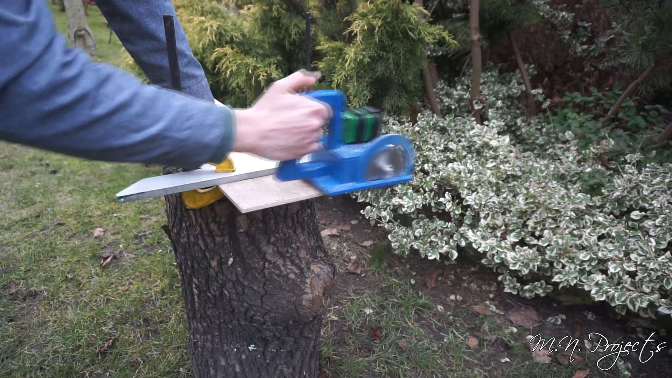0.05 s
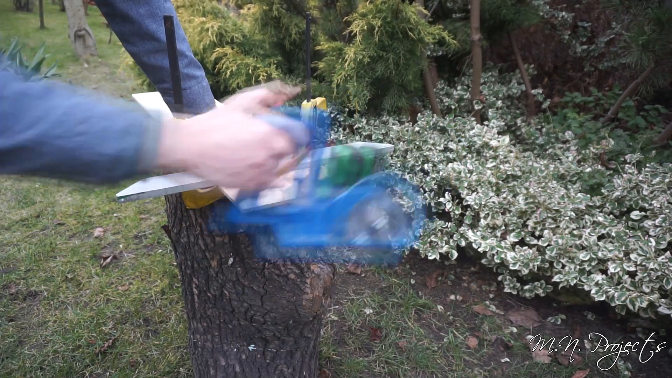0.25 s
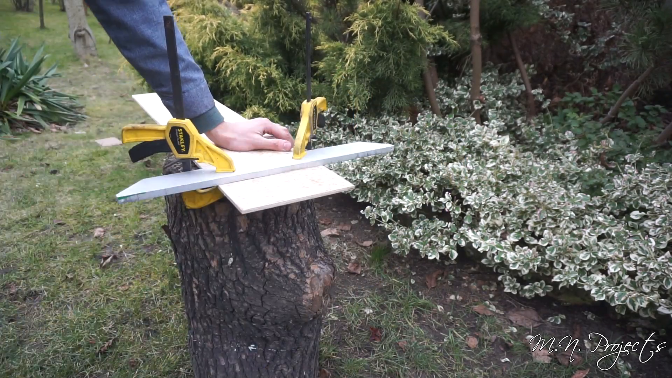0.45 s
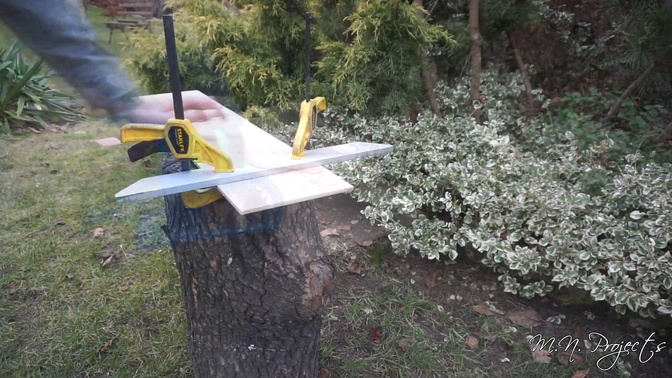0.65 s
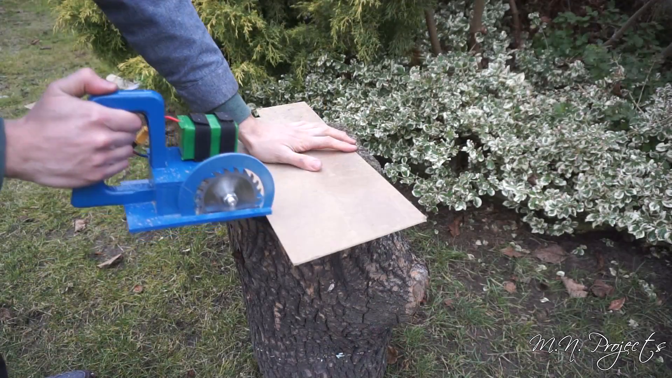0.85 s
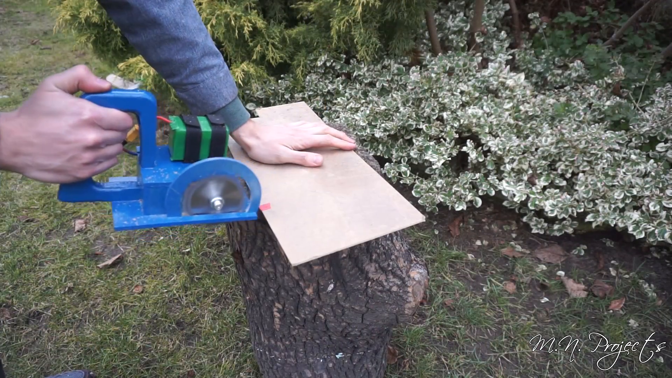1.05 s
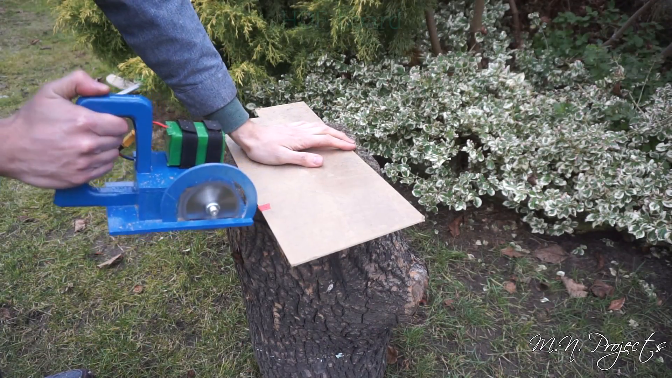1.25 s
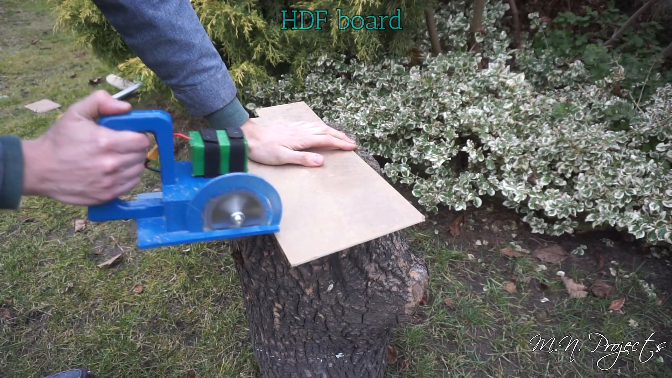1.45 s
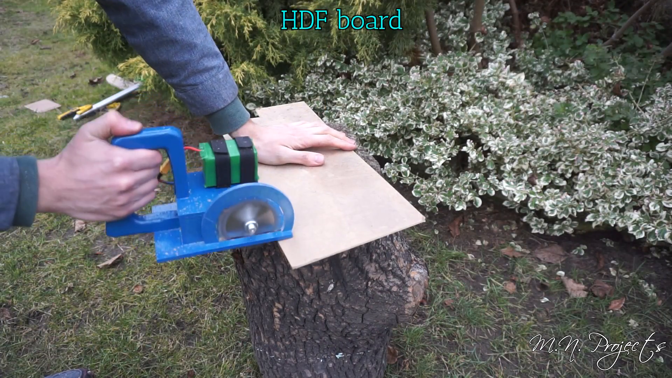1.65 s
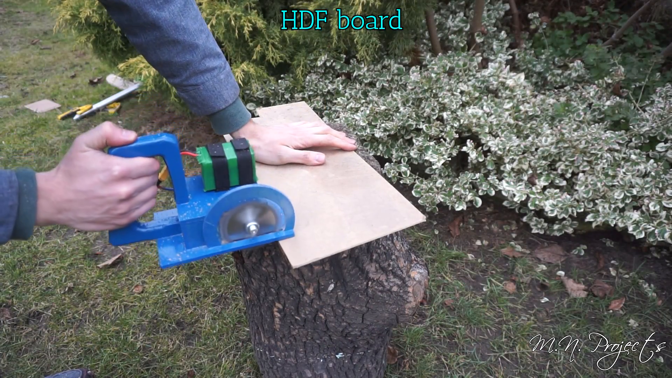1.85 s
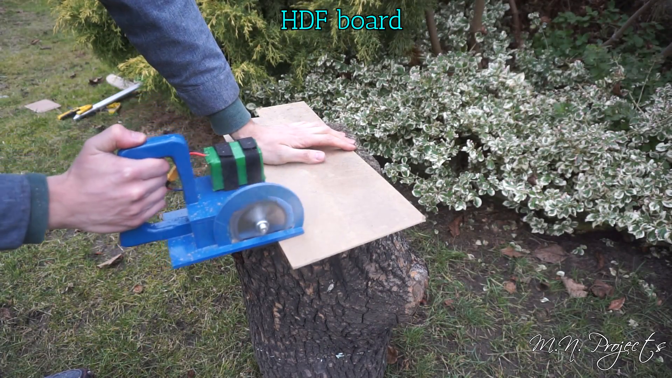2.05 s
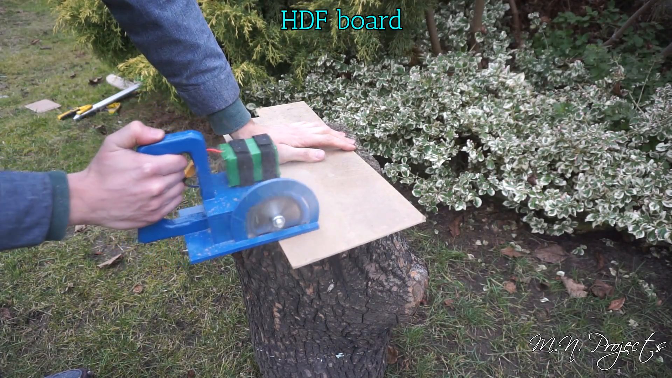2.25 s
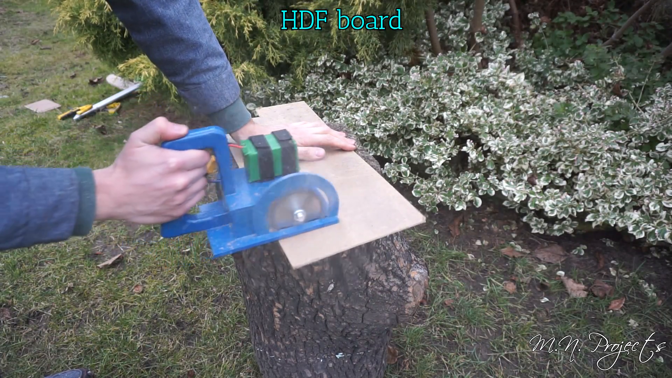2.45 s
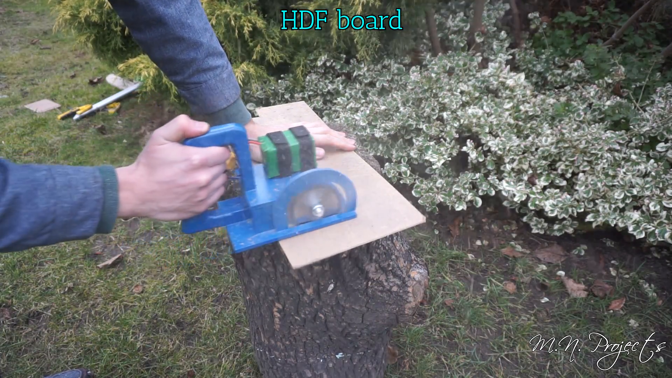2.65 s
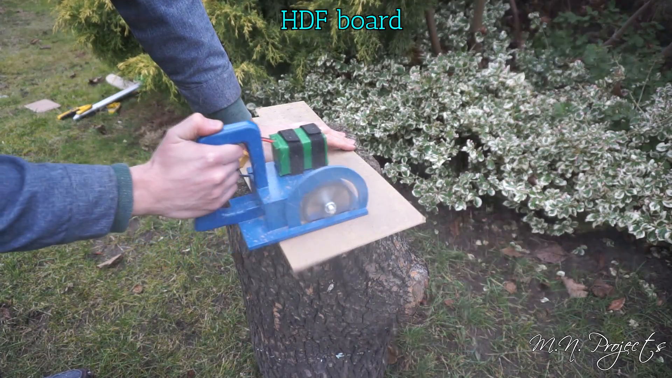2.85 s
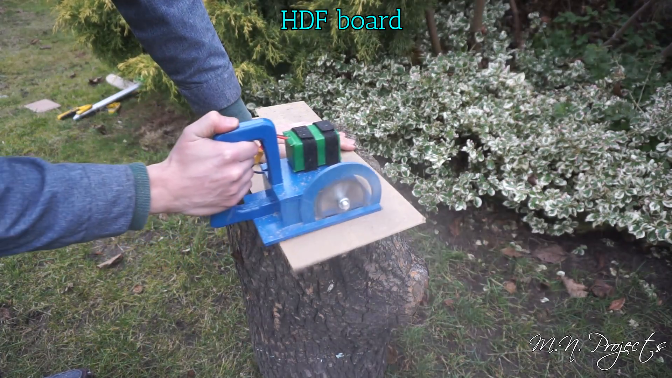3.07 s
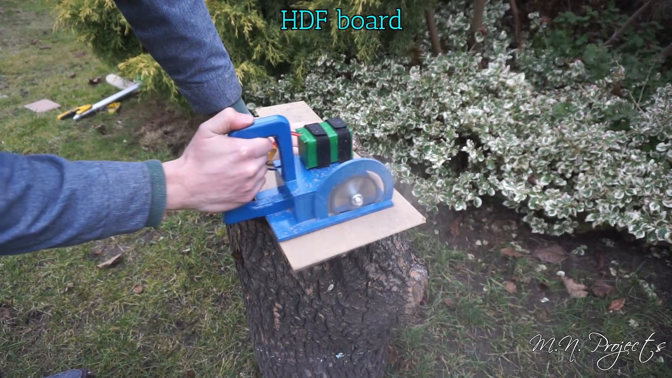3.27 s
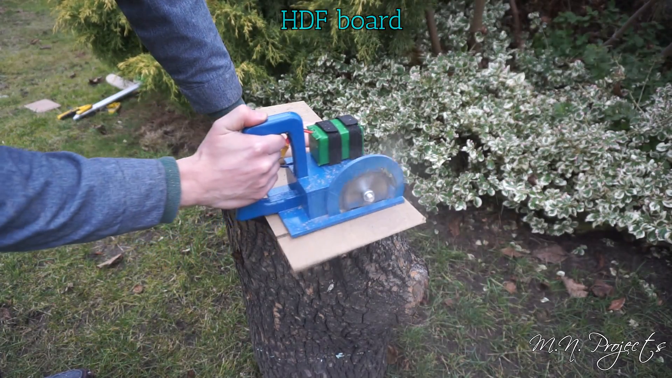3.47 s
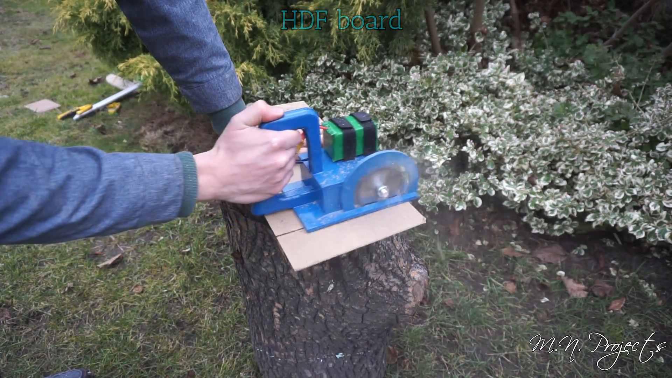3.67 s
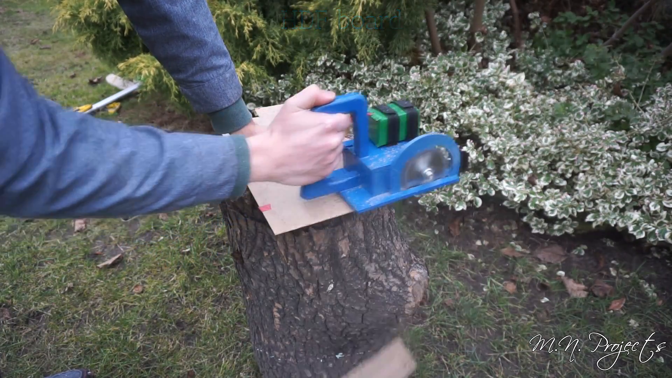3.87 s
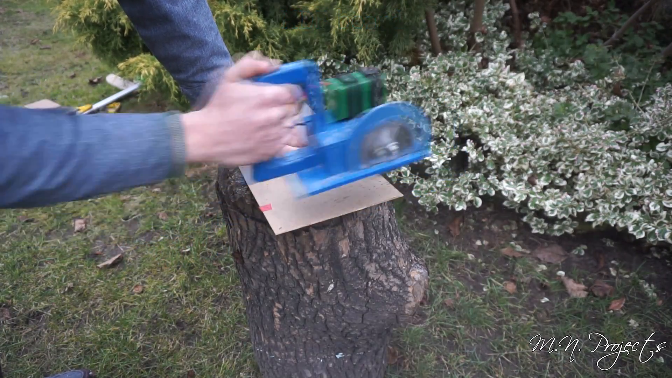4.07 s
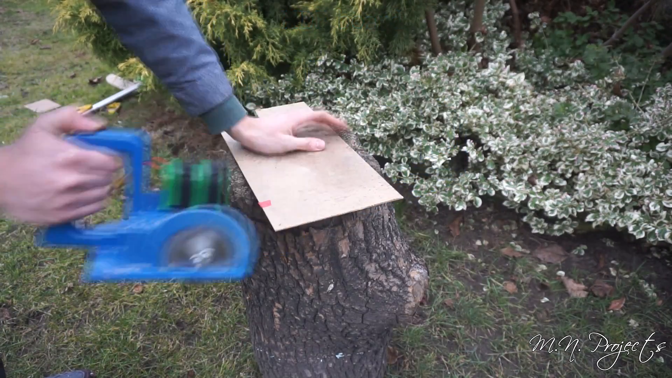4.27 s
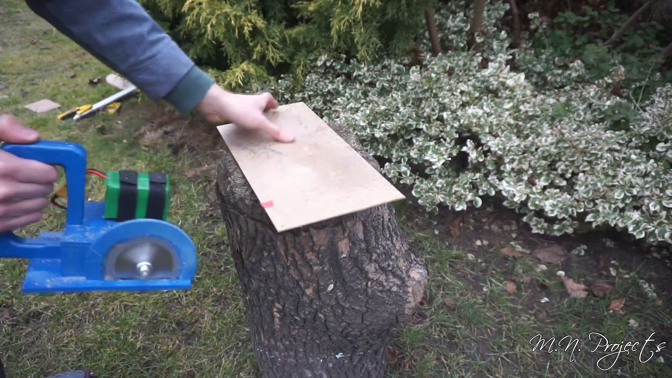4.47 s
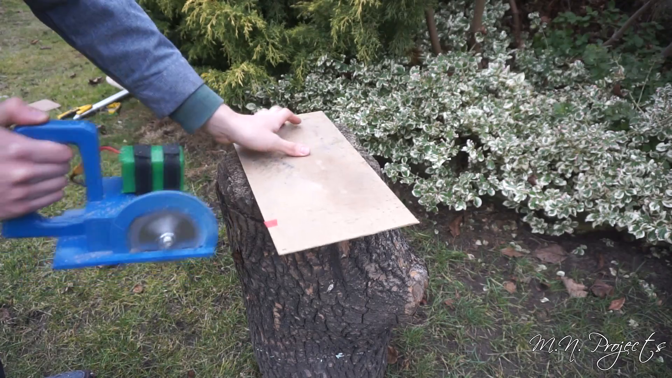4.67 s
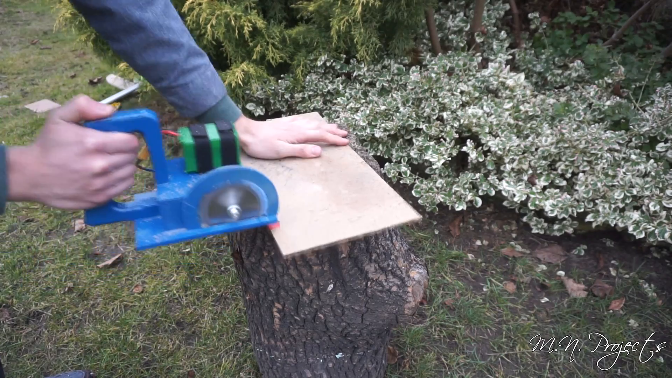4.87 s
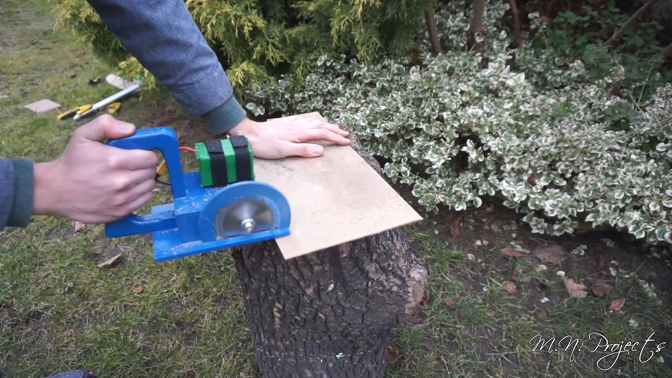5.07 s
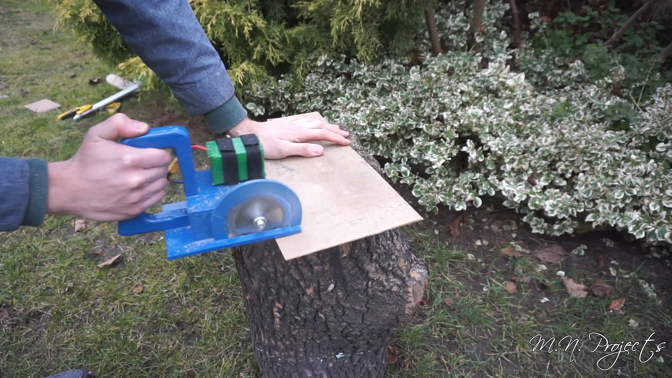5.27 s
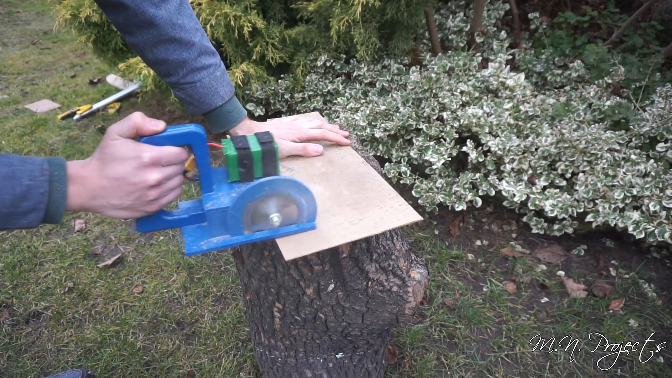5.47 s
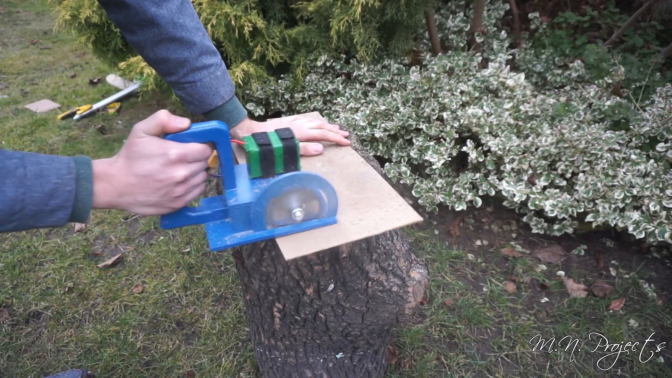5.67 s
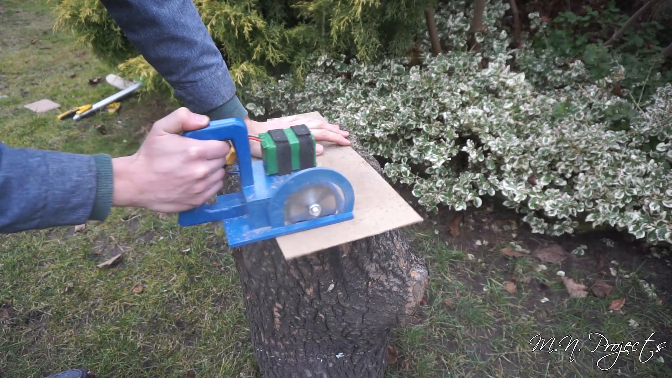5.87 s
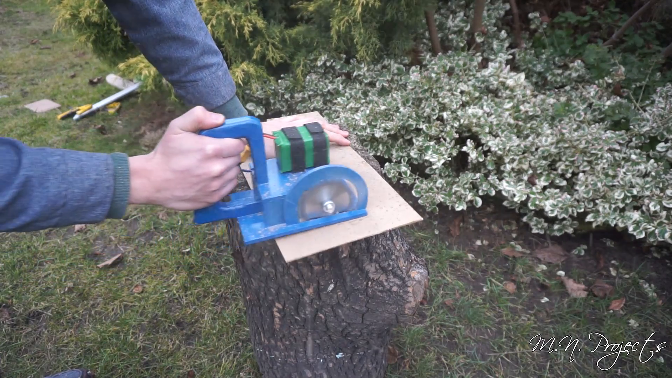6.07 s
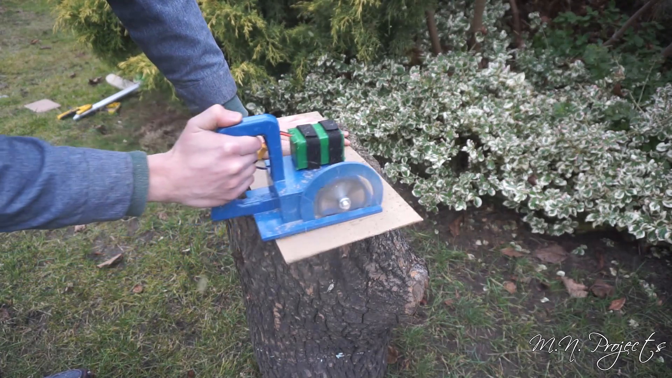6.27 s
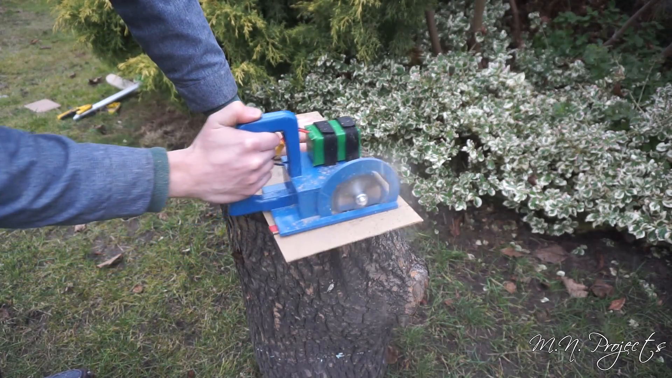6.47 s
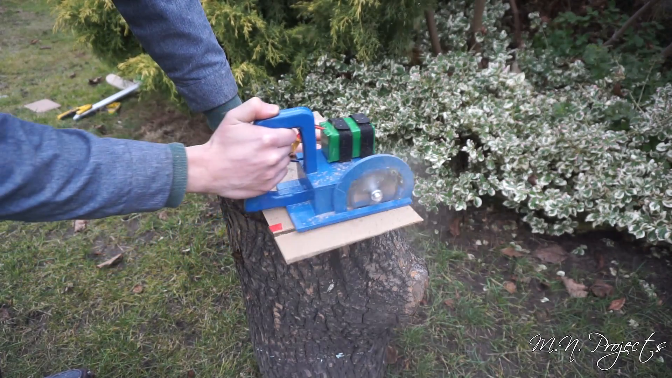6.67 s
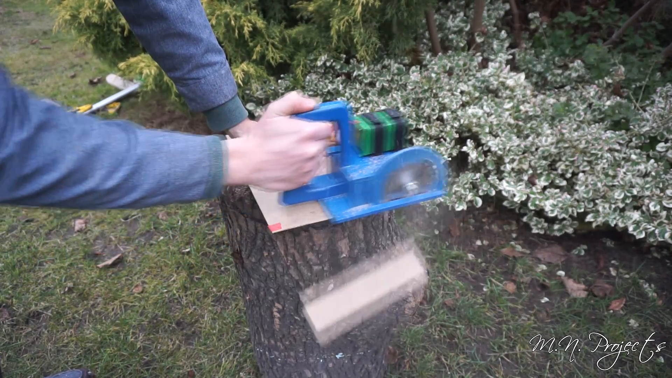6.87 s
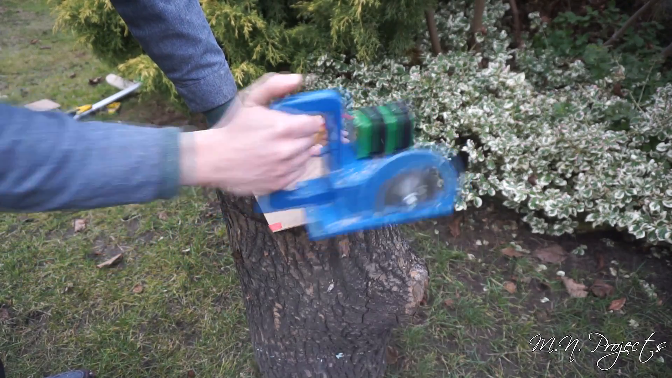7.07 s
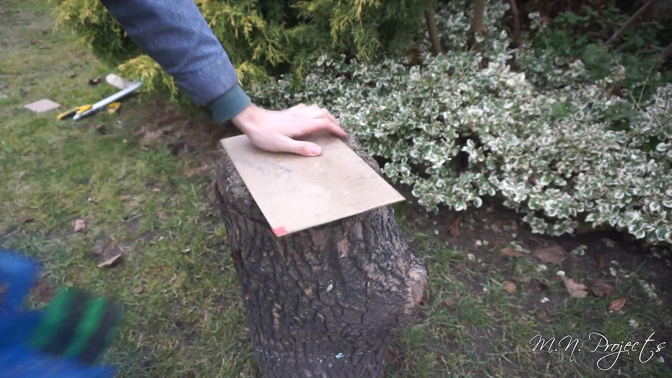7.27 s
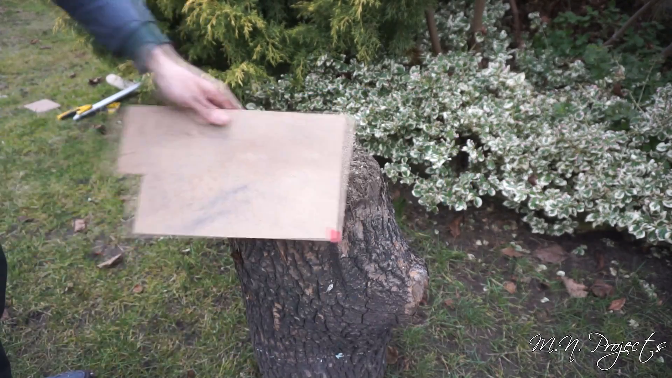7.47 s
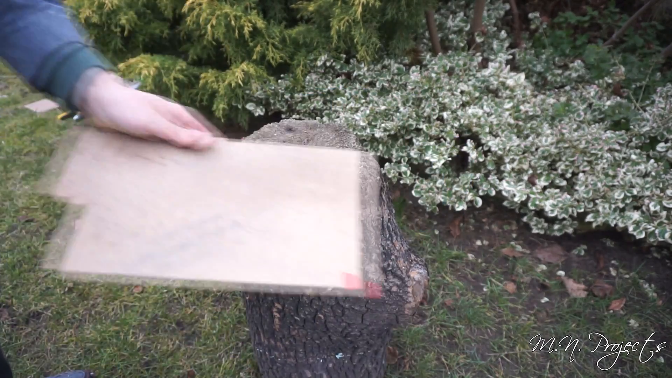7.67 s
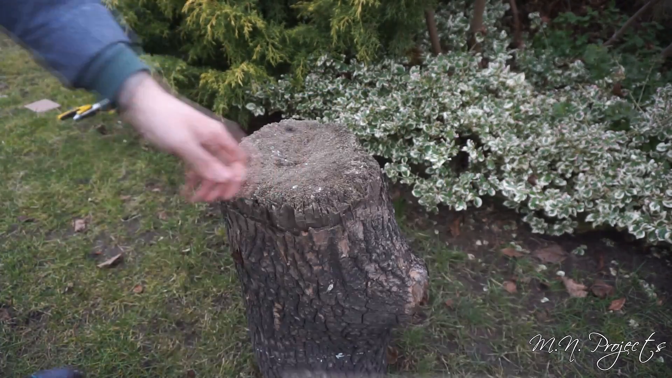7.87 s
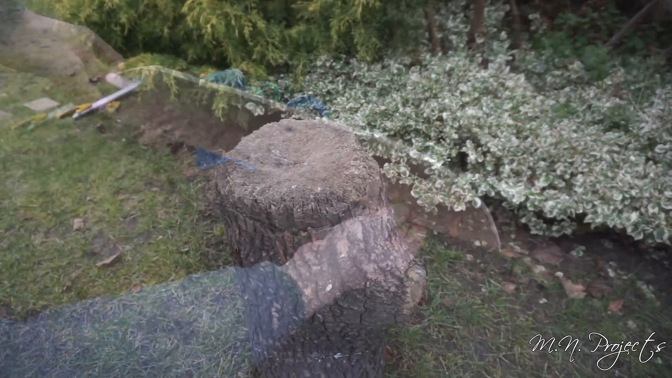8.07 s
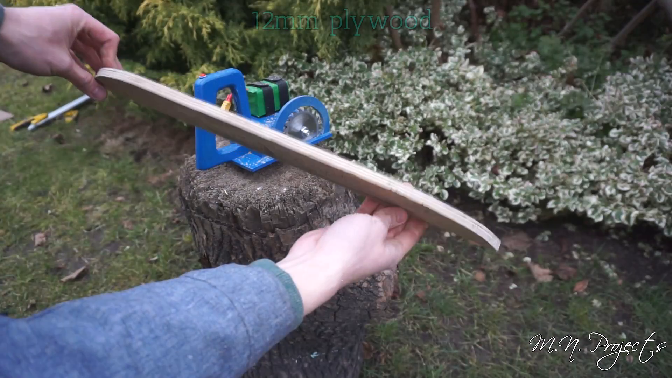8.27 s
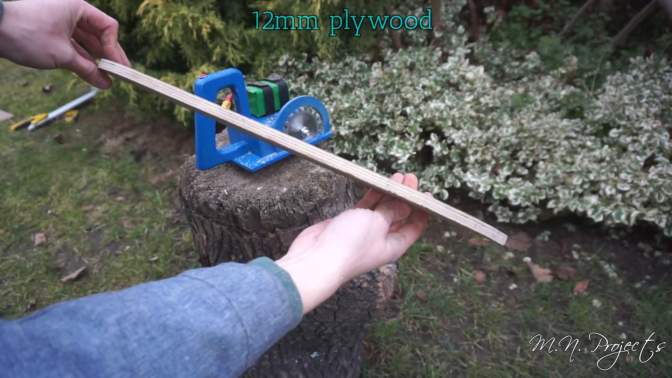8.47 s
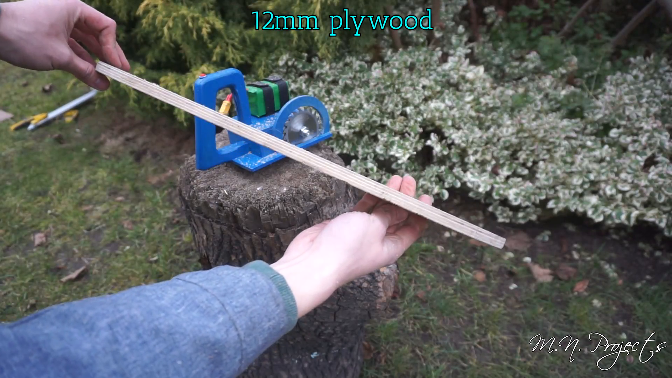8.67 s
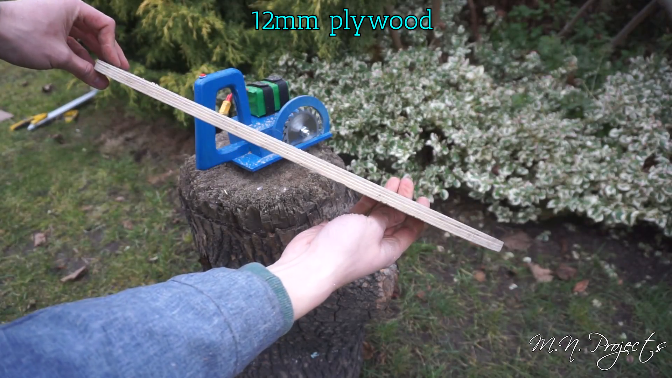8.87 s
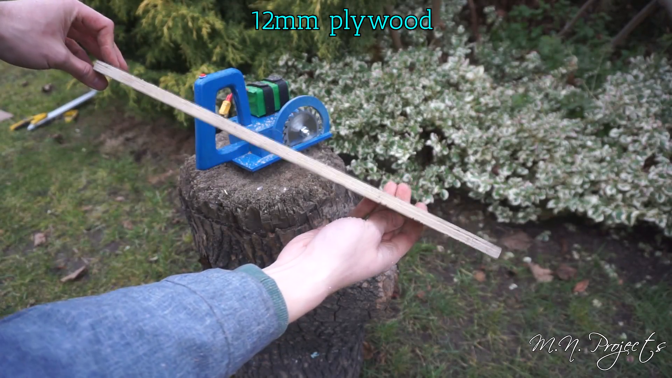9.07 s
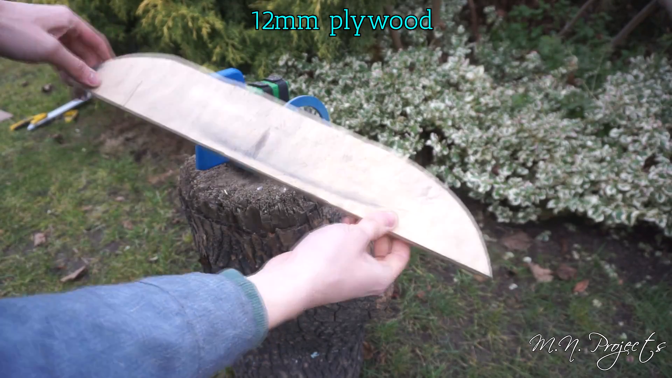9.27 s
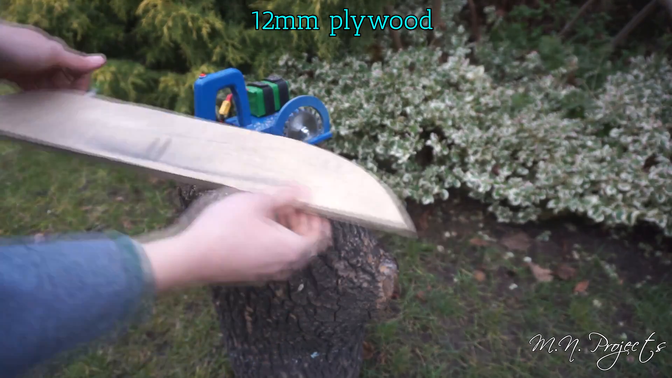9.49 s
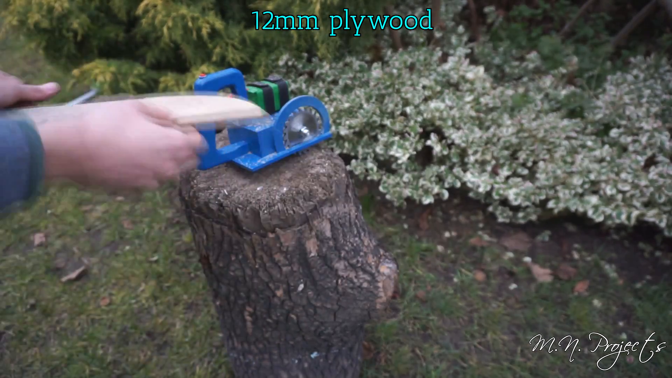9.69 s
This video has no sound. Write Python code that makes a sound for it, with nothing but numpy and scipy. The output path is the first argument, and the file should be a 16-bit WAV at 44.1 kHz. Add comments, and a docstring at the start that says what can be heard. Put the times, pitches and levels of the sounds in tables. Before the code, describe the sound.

Close outdoor power saw: high motor whine, two rough screaming cuts through thin fibreboard, wooden offcut knocks, run-down with ringing steel, then soft handling.

```python
"""In a garden a small geared circular saw finishes a cut and stops, spins up again, cuts a thin board twice
and runs down while its steel blade rings on. Gear orders, a comb of weak lines and hiss make the motor.
Under load the speed sags, so the tooth note sinks; noise through blade and board modes gives shriek and roar.
Filtered-noise wind, a distant wash and rustle, and decaying wooden knocks, fill the pauses in close stereo."""
import sys
import numpy as np
from scipy import signal
from scipy.fft import irfft
from scipy.io import wavfile
from scipy.ndimage import uniform_filter1d, map_coordinates

SR = 44100
rng = np.random.default_rng(int(sys.argv[2]) if len(sys.argv) > 2 else 0)


def file_out(sig):
    """Save sig as 16-bit WAV at sys.argv[1]."""
    # one column per channel
    cols = np.atleast_2d(sig).T
    # limit, then scale
    lim = np.clip(cols, -1, 1)
    pcm = np.round(lim * 32767).astype(np.int16)
    wavfile.write(sys.argv[1], SR, pcm)


N = 429093

# Stereo likeness. Each row: frequency in Hz, left-right likeness 0-1.
LIKENESS = [(60, 0.93), (500, 0.93), (2000, 0.96), (5000, 0.81), (12000, 0.8)]
# Where the sound sits. Each row: time in seconds, left minus right in dB, samples by which the left leads.
PLACE = [(.04, -1.5, -0.5), (0.299, -6, 1.5), (.7, -1, 2), (1.2, 2.5, 2.5), (2.2, 0, 2), (3.2, -1.9, -0.5),
         (4.0, -3.5, -0.5), (4.5, 4, 4.5), (5.7, -0.5, 0.5), (7.2, -4, 1), (7.75, 10, 5.5), (8.08, -2.5, 4),
         (9.73, 0.5, 3.5)]
EDGE_HZ = 16150  # top of the band

# Colours of wind, far wash and rustle. Each row: frequency in Hz, relative level in dB per Hz.
WIND_COLOUR = [(15, -22.5), (43, 3), (60, 6), (200, -16), (400, -38)]
WASH_COLOUR = [(60, -24), (100, -2), (1240, -2), (2000, -9.5), (2800, -19), (6000, -23), (9000, -57)]
RUSTLE_COLOUR = [(880, -17.5), (1500, -1.5), (2140, -3), (6190, -11.5), (11600, -7.5), (16000, -13.5)]
CALM_DB = -93.5  # wind floor, before the wind trim
# Steady wind. Each row: start in seconds, end in seconds, relative dB at the start, relative dB at the end.
BREEZE = [(8.086, 9.812, -45.5, -43.5)]
# Gusts. Each row: peak time in seconds, relative peak in dB, rise in dB/s, fall in dB/s.
GUSTS = [(.92, -31, 100, 66), (1.18, -40, 69, 50), (1.55, -36, 45, 77), (4.05, -48, 204, 102),
         (4.63, -58.5, 100, 105), (4.93, -53.5, 97, 139), (7.25, -60.5, 104.5, 40.5),
         (7.87, -52.5, 200.5, 62)]
# Distant wash. Each row: start in seconds, end in seconds, dB at the start, dB at the end.
FAR_WASH = [(.68, 1.06, -65.5, -48.5), (7.3, 7.56, -76, -85), (8.09, 9.8, -54, -47)]
FAR_FLOOR_DB, FADE_S = -89, 0.0089
# Sleeves and hands. Each row: peak time in seconds, peak in dB, rise in dB/s, fall in dB/s,
# dull part in dB above it.
RUSTLES = [(0.741, -60.5, 116, 44, -4), (0.839, -44, 218, 264, -5), (7.48, -63, 153.5, 500, -9),
           (8.096, -39, 3002, 426, 2.5), (9.099, -59.5, 9, 98, -11.5), (9.52, -43.5, 57, 6, -16)]
# Span without bright rustle: from in seconds, until in seconds.
RUSTLE_GAP = (7.6, 8.085)
HUSHED_S = .68  # until then only the wind and wash floors remain of the garden

# Knocks of wood. Each row: time in seconds, relative level in dB, pitch in Hz,
# treble tick in dB above it, T60 in seconds.
KNOCKS = [(3.939, -15.5, 1302, 1, 0.033), (4.955, -38, 663, -17, 0.042), (7.134, -14.5, 1617, -20, 0.029),
          (8.091, -28.5, 1353, -18, 0.04), (8.11, -27.5, 800, -5, 0.035), (8.725, -47, 2950, -16, 0.027)]
# Brief hums of the board, sawn or handled. Each row: peak time in seconds, peak in dB, pitch in Hz.
HUMS = [(2.12, -35.5, 468), (2.41, -29, 1580), (5.38, -55, 232.4), (5.3, -38.5, 3290), (5.63, -27, 1831),
        (5.69, -33, 2730), (5.751, -26.5, 2106), ]
HUM_RISE_DB_PER_S, HUM_FALL_DB_PER_S, HUM_WIDTH = 240, 100.5, 0.095

# Trigger pulls. Each row: on in seconds, off in seconds, run-down time in seconds.
TRIGGER = [(-1, .15, .125), (1.01, 7.09, .21)]
# Speed under load, one table a cut. Each row: time in seconds, teeth passing in Hz.
LOADED = [
    [(0, 1216), (.07, 1268)],
    [(1.86, 1274), (1.97, 1239), (2.05, 1158), (2.25, 1059), (2.54, 1008), (2.7, 848), (2.81, 659),
     (2.87, 659), (3.0, 738.3), (3.15, 698), (3.78, 710)],
    [(5.17, 1284), (5.38, 1104), (5.62, 1030), (5.74, 874), (5.79, 750), (5.91, 636), (6.04, 836.4),
     (6.16, 779), (6.22, 647), (6.34, 621.7), (6.52, 666), (6.63, 510.4), (6.7, 498), (6.76, 748.4),
     (6.87, 744)],
]
TEETH = 20
FREE_HZ, STILL_HZ = 1282.5, 30.183  # teeth passing: unloaded before any droop, and the lower limit
DROOP_HZ_PER_S, BRAKE_KNEE = 1.2, 1.5  # the battery tires; shape of the run-down
SPIN_UP_S, SPIN_UP_KNEE = .108, 2  # the speed closes in as exp(-(t / time) ** knee)
RECOVER_S, RECOVER_KNEE = .04, .9  # likewise after a cut

# Motor and gears: level and tone over time. Each row: time in seconds, relative level at full speed in dB,
# blend from the first tone to the second 0-1.
MOTOR = [(.07, -43, 0.4), (.16, -44, 0.62), (.36, -54, 0.9), (1.0, -18, 0.44), (1.705, -17, 0.27),
         (1.73, -27, 0.13), (1.845, -19.5, 0.07), (3.82, -36, 0.1), (3.95, -40.5, 0.82), (4.2, -39, 0.74),
         (4.75, -37.5, 0.6), (5.16, -34, 0.45), (6.9, -38.5, 0.34), (7.13, -41.5, 1), (7.5, -45, 0.99)]
# Whine orders: multiples of the blade turn.
MULTIPLES = [6, 9, 15, 27, 30, 33, 35, 36.53, 44, 56.05, 59, 64]
# Whine on those multiples. Each row: relative dB in the first tone, relative dB in the second.
WHINE = [(-14, -65), (-30.5, -17), (-24.5, -32.5), (-9, -20), (-9, -6.5), (-15.5, -10.5), (-14.5, -21.5),
         (-26, -9.5), (-23.5, -22.5), (-17.5, -26.5), (-21.5, -8.5), (-13, -19.5)]
# Hum on the ninth multiple. Each row: time in seconds, dB above its whine.
HUM_LEVEL = [(1.9, 11), (3.98, -9.5), (4.17, 10), (4.45, 1.5), (4.95, 9), (5.15, 5), (7.0, -0.5)]
# Gear mesh noise. Each row: multiple of the blade turn, width in Hz, relative level in dB.
CHATTER = [(28.44, 300, -11.5), (59.4, 120, -12), (61.9, 290, -21.5)]
# Casing colour in the first and second tone. Each row: frequency in Hz, relative level in dB per Hz.
CASING_FIRST = [(200, -30.5), (570, -21), (1350, -13.5), (1940, -18), (2610, -6), (4000, -14), (6500, -13),
                (10500, -17), (16000, -36.5)]
CASING_SECOND = [(200, -71), (570, -38), (1180, -30.5), (1870, -6), (2610, -12.5), (4000, -7.5),
                 (5000, -28.5), (10700, -20), (16000, -52)]
# Blade guard resonance. Each row: frequency in Hz, width in Hz, relative level in dB.
GUARD = [(5270, 110, -6)]
SLOWING, IDLE, DROWN_S = 1.3, 0.12, 0.012  # level follows (speed + IDLE) ** SLOWING; fade around a cut

# Low blade modes. Each row: pitch at rest in Hz, Hz added per blade turn a second,
# Hz to the twin it beats with (the lowest mode takes its beat from RINGING).
RING = [(1648, -2.9, 0), (2802, 4.15, 5.45), (4118, .4, 8)]
# Ringings: steady, then dying. Each row: start in seconds, dies from in seconds, end in seconds,
# beat of the lowest mode in Hz, damping factor of the upper two, relative dB of the three modes.
RINGING = [(.08, 0.41, .67, .8, 2.2, -57, -69.5, -60), (3.82, 5.05, 5.16, 3.0, 1, -54, -66, -73),
           (6.89, 7.13, 7.13, .6, 1, -55, -65, -58), (7.17, 7.345, 8.08, 1.9, 1, -54.5, -61, -65)]
# One figure a low mode: T60 in seconds, before the damping factor.
RING_T60_S = [1.8, 2.8, 1.1]
# One figure a low mode: lift in dB at full speed.
RING_SPUN_DB = [2, 11, 8.5]
# One figure a low mode: the wave running the other way round the turning disc, in relative dB.
MIRROR_DB = [-17, -14, -30]
BEAT = .8  # depth of the beating

# Cuts. Each row: start in seconds, end in seconds, shriek in dB at the start, shriek in dB at the end,
# lift in dB that scales the tooth note and the push on the board.
CUTS = [(-.1, 0.039, -49, -25.5, -18), (1.866, 3.767, -23, -24.5, -1.5), (5.169, 6.851, -23.5, -23.5, -1.5)]
# Touches before a cut. Each row: time in seconds, peak in dB, rise in dB/s, fall in dB/s.
GRAZES = [(1.715, -21, 900, 600), (1.772, -23, 600, 480), (1.854, -25, 800, 300)]
# Board roar and steel grit colours. Each row: frequency in Hz, relative level in dB per Hz.
BOARD = [(60, -80.5), (150, -69), (400, -20), (700, -7), (1300, -1), (2450, -3.5), (3460, 2.5),
         (4670, -5.5), (6500, -27.5), (8500, -44.5)]
GRIT = [(3500, -40), (4800, -14), (6600, -17), (10300, -13), (11500, -7), (13000, -17), (15650, -15),
        (15850, -60)]
# High blade modes, each split by the turning. Each row: pitch at rest in Hz,
# shift either way in Hz per blade turn a second.
SHRIEK = [(5310, 0), (7280, 3), (9610, 4.15), (11955, 5), (14060, 6.2), (15990, 8.8)]
# Their levels. Each row: lower half in relative dB, upper half in relative dB.
SHRIEK_DB = [(1, 1), (-6.5, -3.5), (-3, 1), (3.5, 5.5), (1, -1), (-8.5, -11)]
# How the board answers the tooth note. Each row: frequency in Hz, relative level in dB.
NOTE = [(490, -5), (650, -12), (780, -8), (860, -12.5), (1020, -10.5), (1110, -14.5), (1280, -9.5),
        (1450, -12), (1700, -10.5), (2050, -11), (2300, -16), (2550, -11), (3800, -22)]
# Octave of the note. Each row: time in seconds, dB above the note before the board's answer.
OCTAVE = [(1.95, -9), (2.12, 9.5), (2.35, -1.5), (2.8, 1), (2.97, -2.5), (3.6, 3), (5.2, 15), (5.33, -8),
          (5.9, -2.5), (6.24, 2)]
THIRD_DB = -6.5  # third harmonic, likewise
# Range over which the stalling tooth note recovers its level: lower end in Hz, upper end in Hz.
STALL_HZ = (540, 615)
# Centre pitch of the pinched disc, one table a long cut. Each row: time in seconds, pitch in Hz.
SQUEAL = [
    [(1.9, 3790), (1.946, 3320), (2.108, 3560), (2.454, 3170), (2.49, 3650), (2.716, 3550), (3.036, 3680),
     (3.78, 3508)],
    [(5.2, 3361), (5.486, 3610), (5.624, 3220), (5.666, 3704), (5.99, 3410), (6.012, 3245), (6.184, 3620),
     (6.258, 3430), (6.86, 3428)],
]
SQUEAL_SHARE = .7
BITE_S, LEAVE_S, SINK_S = .005, 0.057, 0.057  # attack, release, time for the tooth note to build
AFTER_DB, AFTER_DB_PER_S = -35.5, 138  # the shriek rings on after the blade leaves the wood


def amp(db):
    """Turns dB into gain."""
    return 10 ** (np.asarray(db) / 20)


def evened(x):
    """Scales a signal to rms 1."""
    return x / np.sqrt(np.mean(x ** 2) + 1e-20)


def read(points, hz):
    """Reads a spectrum table on a log frequency axis."""
    f, value = np.transpose(points)
    return np.interp(np.log(hz + 1), np.log(f + 1), value)


def curves(rows):
    """Draws every column of a time table at every sample."""
    s, *columns = np.transpose(rows)
    return np.array([np.interp(np.arange(N) / SR, s, c) for c in columns])


def held(rows, rise_s, fall_s):
    """Gain of stretches that fade in, slide from one level to another and fade out."""
    t = np.arange(N) / SR
    total = 0
    for start, end, start_db, end_db in rows:
        fade = np.interp(t, [start - rise_s, start, end, end + fall_s], [0, 1, 1, 0])
        total = total + fade * amp(np.interp(t, [start, end], [start_db, end_db]))
    return total


def swells(rows):
    """Gain of swells that climb to a peak and sink again at steady dB rates."""
    t = np.arange(N) / SR
    return sum(amp(db - np.maximum(rise * (s - t), fall * (t - s))) for s, db, rise, fall in rows)


def wander(hz):
    """Smooth random drift of rms 1, from two random knots per cycle of hz."""
    knots = rng.standard_normal(1200)[:int(N / SR * 2 * hz) + 2]
    return evened(map_coordinates(knots, [np.linspace(0, len(knots) - 1, N)], order=3))


def resonate(x, hz, width):
    """Gliding resonance: shifts the curve hz down to zero, smooths twice and shifts back."""
    turn = np.exp(2j * np.pi * np.cumsum(hz * np.ones(N)) / SR)
    r = np.exp(-np.pi * width / SR)
    smooth = signal.lfilter([1], np.convolve([1, -r], [1, -r]), x / turn)
    return evened((turn * smooth).real)


def noise(spectrum, patchy_db, streaky_db=0., modes=(), likeness=1):
    """Stereo noise of rms 1 with wide patches and thin short streaks; modes stand out of the spectrum."""
    frames, hz = N // 256 + 5, np.fft.rfftfreq(1024, 1 / SR)
    a, b, c, d, patches, streaks = rng.standard_normal((6, frames, 513)).transpose(0, 2, 1)
    patches = evened(uniform_filter1d(uniform_filter1d(patches, size=9, axis=0), size=12, axis=1))
    streaks = evened(uniform_filter1d(uniform_filter1d(streaks, size=2, axis=0), size=16, axis=1))
    power = amp(read(spectrum, hz))[:, None] ** 2
    for f, width, db in modes:
        f = np.interp(np.arange(frames) * 256, np.arange(N), f * np.ones(N))
        power = power + amp(db) ** 2 / (1 + (2 * (hz[:, None] - f) / width) ** 2)
    same = np.clip(likeness * read(LIKENESS, hz), 0, 1)[:, None]
    # the left leads by the placed lag, and each frequency keeps a small offset of its own
    lag = np.interp(np.arange(frames) * 256 / SR, *np.transpose(PLACE)[::2])
    phase = hz[:, None] * (2 * np.pi * lag / SR + 0.000078 * patches[:, :1])
    right = a + 1j * b
    left = (same * right + np.sqrt(1 - same ** 2) * (c + 1j * d)) * np.exp(1j * phase)
    texture = amp(patchy_db * patches + streaky_db * streaks)
    z = np.array([left, right]) * np.sqrt(power) * texture
    return evened(signal.istft(z, nperseg=1024, noverlap=768)[1][:, :N])


def garden():
    """Air and cloth as shaped noise: lumpy wind with a low hum in it, a far wash and close rustle."""
    astir = held([(HUSHED_S, N / SR, 0, 0)], FADE_S, FADE_S)
    hum = amp(-6.0) * resonate(rng.standard_normal(N), 54, 3.9)
    blowing = amp(CALM_DB) + astir * swells(GUSTS) + held(BREEZE, FADE_S, FADE_S)
    wind = blowing * amp(-7.0 + 0.83 * wander(3.7)) * (noise(WIND_COLOUR, 5) + hum)

    ungated = 1 - held([(*RUSTLE_GAP, 0, 0)], 0.049, 0.0044)
    handling = astir * ungated * swells([row[:4] for row in RUSTLES])
    rustle = handling * amp(1.4 * wander(22)) * noise(RUSTLE_COLOUR, 1.4, likeness=0.52)
    # the dull part of each rustle shares the colour of the wash
    dull = astir * swells([(s, db + more_db, rise, fall) for s, db, rise, fall, more_db in RUSTLES])
    wash_level = amp(FAR_FLOOR_DB) + held(FAR_WASH, FADE_S, 0.34) + dull
    return wind + wash_level * noise(WASH_COLOUR, 1.1, likeness=0.27) + rustle


def knocks():
    """Struck wood: a short decaying ring with a rattle over it and a bright tick."""
    out, t = np.zeros((2, N)), np.arange(6000) / SR
    for s, db, hz, tick_db, t60 in KNOCKS:
        rattle, *tick = np.gradient(rng.standard_normal((3, 6000)), axis=1)
        rattle = evened(uniform_filter1d(uniform_filter1d(rattle, size=6), size=5))
        body = np.sin(2 * np.pi * hz * t) + 0.32 * rattle
        envelope = amp(-60 * t / t60) * (1 - np.exp(-t / 0.0035)) ** 2
        sound = (body + amp(tick_db) * np.array(tick)) * envelope
        out[:, round(s * SR):][:, :6000] += amp(db + 5.0) * sound
    return out


def hums():
    """Noise through a narrow resonance: the board drones for a moment on one of its pitches."""
    shaking = rng.standard_normal(N)
    out = 0
    for s, db, hz in HUMS:
        level = swells([(s, db, HUM_RISE_DB_PER_S, HUM_FALL_DB_PER_S)])
        out = out + level * resonate(shaking, hz, 15 + HUM_WIDTH * hz ** 0.83)
    return out


def speed_hz():
    """Teeth passing a second: spin-up, braking, the sag under load and the recovery after each cut."""
    t = np.arange(N) / SR

    def gap(since, time_s, knee):
        """Share of a speed change still to come."""
        return np.exp(-(np.maximum(since, 0) / time_s) ** knee)

    free, sag = 0, 0
    for on, off, down_s in TRIGGER:
        spun_up = 1 - gap(t - on, SPIN_UP_S, SPIN_UP_KNEE)
        free = free + (FREE_HZ - DROOP_HZ_PER_S * t) * spun_up * gap(t - off, down_s, BRAKE_KNEE)
    for rows in LOADED:
        drag = (t >= rows[0][0]) * (FREE_HZ - curves(rows)[0])
        sag = sag + drag * gap(t - rows[-1][0], RECOVER_S, RECOVER_KNEE)
    return np.maximum(free - sag, STILL_HZ)


def motor(teeth_hz):
    """Shaft and gear orders, chatter that glides with them, and the hiss of casing and brushes."""
    level_db, blend = curves(MOTOR)
    blend = np.clip(blend, 0, 1)
    left_lead = curves(PLACE)[1] * np.array([[1], [0]]) * teeth_hz
    turns = (np.cumsum(teeth_hz) + left_lead) / TEETH / SR
    speed, hum_db = teeth_hz / teeth_hz.max(), curves(HUM_LEVEL)[0]

    # whine dies as the speed drops; tones near the thirtieth multiple last longest
    tones = 0
    for k, (first_db, second_db) in zip(MULTIPLES, WHINE):
        tone_db = first_db + blend * (second_db - first_db) + (k == 9) * hum_db + 1.1 * wander(7.0)
        slowing = speed ** (3.2 + 4.0 * abs(np.log(k / 30)))
        tone = np.sin(2 * np.pi * (k * turns + rng.random()))
        tones = tones + amp(tone_db) * np.sqrt(2) * slowing * tone

    # small flaws of the gears repeat with every blade turn: a dense comb of weak lines
    k = np.arange(2049)
    for colour, share, db in [(CASING_FIRST, 1 - blend, -8), (CASING_SECOND, blend, -1.5)]:
        flaws = amp(read(colour, k * teeth_hz.max() / TEETH) + 3.5 * rng.standard_normal(2049))
        lines = flaws * (k > 6) * (k < 92) * np.exp(2j * np.pi * rng.random(2049))
        pattern = evened(irfft(lines))
        comb = map_coordinates(pattern, [turns % 1 * 4096], order=1, mode="grid-wrap")
        tones = tones + share * amp(db + 2.0 * wander(11)) * speed ** 1.4 * comb

    hiss = rng.standard_normal((2, N))
    hiss[1] = 0.91 * hiss[0] + 0.32 * hiss[1]
    chatter = sum(amp(db - 2.1 * blend) * resonate(hiss, k * teeth_hz / TEETH, width)
                  for k, width, db in CHATTER)
    first = (1 - blend) * amp(-6.5) * noise(CASING_FIRST, 1.2, 4.5)
    casing = first + blend * amp(-5.0) * noise(CASING_SECOND, 3.0, 1.1, GUARD)
    brushes = 1 + 0.11 * np.cos(2 * np.pi * 3 * turns)  # the motor turns three times for each blade turn

    turning = uniform_filter1d(1. * (teeth_hz > STILL_HZ + 60), size=4000)
    unloaded = 1 - held([(a, b, 0, 0) for a, b, *_ in CUTS], DROWN_S, DROWN_S)
    level = turning * unloaded * amp(level_db) * ((speed + IDLE) / (1 + IDLE)) ** SLOWING
    return level * (tones + chatter * speed ** 1.6 + brushes * casing)


def blade(teeth_hz):
    """The disc rings on in beating twins; its modes slide back to their rest pitch as it slows."""
    t, out = np.arange(N) / SR, 0
    turn_hz, speed = teeth_hz / TEETH, teeth_hz / FREE_HZ
    for k, ((hz, spin, twin), t60) in enumerate(zip(RING, RING_T60_S)):
        level = 0
        for start, dies, end, beat_hz, damping, *dbs in RINGING:
            stretch = held([(start, end, dbs[k], dbs[k])], 0.033, 0.0095)
            decay = amp(-60 * (damping if k else 1) * np.maximum(t - dies, 0) / t60)
            beating = 1 + BEAT * np.cos(2 * np.pi * (twin if k else beat_hz) * (t - dies))
            level = level + stretch * decay * beating
        wave = np.sin(2 * np.pi * np.cumsum(hz + spin * turn_hz) / SR)
        mirror = np.sin(2 * np.pi * np.cumsum(hz - spin * turn_hz) / SR)
        mirror = amp(MIRROR_DB[k] + 2.1 * wander(11)) * np.sqrt(speed) * mirror
        out = out + level * amp(RING_SPUN_DB[k] * speed + 2.8 * wander(22)) * (wave + mirror)
    return out


def cut(teeth_hz):
    """Teeth bite the board: a rough note at their rate, the board's roar and the shriek of the steel."""
    level = held([row[:4] for row in CUTS], BITE_S, LEAVE_S) + swells(GRAZES)
    sunk = held([(a + SINK_S, b, db, db) for a, b, *_, db in CUTS], SINK_S, LEAVE_S)
    # the blade runs out of true
    wobble = np.cos(2 * np.pi * np.cumsum(teeth_hz / TEETH * (1 + 0.0782 * wander(5.7))) / SR)
    bites = rng.standard_normal(N)

    # an uneven feed shakes the pitch
    teeth = np.cumsum(teeth_hz * (1 + 0.01101 * wander(30) + 0.004016 * wander(7))) / SR
    rough = .35 + 2.1 * (1 - teeth_hz / FREE_HZ)  # the slower, the rougher
    note = 0
    for k, db in enumerate([0, curves(OCTAVE)[0], THIRD_DB], start=1):
        partial = np.cos(2 * np.pi * k * teeth) + rough * resonate(bites, k * teeth_hz, 92)
        note = note + amp(db + read(NOTE, k * teeth_hz) + 1.2 * wander(12)) * partial
    note = np.interp(teeth_hz, STALL_HZ, [.25, 1]) * note
    note = signal.sosfilt(signal.butter(3, 350, "high", fs=SR, output="sos"), note)

    # the pinched disc sings on a drifting pitch
    squeal_hz = curves(np.concatenate(SQUEAL))[0] * (1 + 0.033 * wander(9))
    squeal = resonate(bites, squeal_hz, 310)
    pushed = 0.32 + 0.52 * sunk  # a grazing touch sings in the steel but moves the board less
    roar = noise(BOARD, 0.59, 4.15) + SQUEAL_SHARE * squeal
    board = amp(0.85 + 0.53 * wander(17)) * pushed * (1 + 0.11 * wobble) * roar

    modes = [(hz + way * spin * teeth_hz / TEETH, 0.0025 * hz, db)
             for (hz, spin), dbs in zip(SHRIEK, SHRIEK_DB) for way, db in zip((-1, 1), dbs)]
    shriek = amp(1.0 * wander(10)) * (1 + 0.089 * wobble) * noise(GRIT, 0.93, 2.94, modes)
    after = swells([(b + LEAVE_S, db + AFTER_DB, 1000, AFTER_DB_PER_S) for _, b, _, db, _ in CUTS])
    return after * shriek + level * (shriek + board + sunk * (1 + 0.29 * wobble) * note)


def scene():
    """Sums the layers; the whole sound drifts between left and right over time."""
    teeth_hz = speed_hz()
    side = amp(curves(PLACE)[0] * np.array([[.5], [-.5]]))
    return side * (garden() + knocks() + hums() + motor(teeth_hz) + blade(teeth_hz) + cut(teeth_hz))


def record(dry):
    """Limits the band with a steep linear-phase low-pass."""
    low_pass = signal.firwin(1023, EDGE_HZ, window=("kaiser", 9), fs=SR)
    return signal.oaconvolve(dry, low_pass[None], "same")


dry = scene()
out = record(dry)
file_out(out)
```